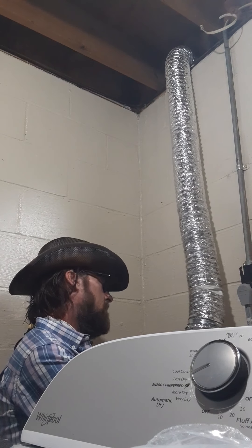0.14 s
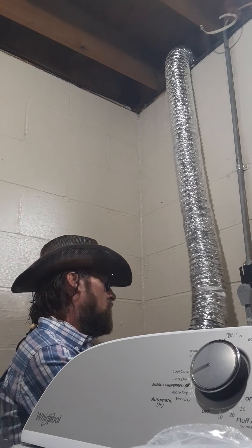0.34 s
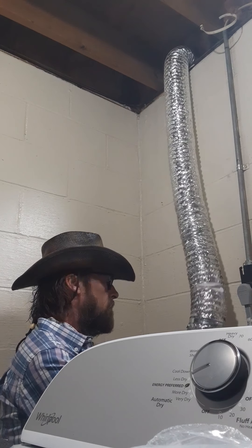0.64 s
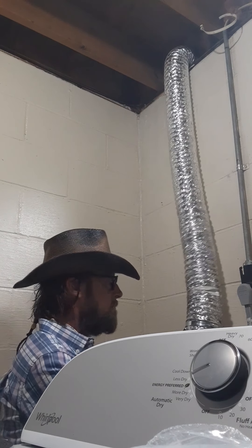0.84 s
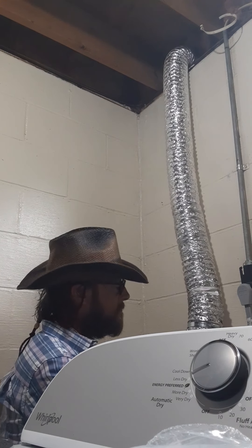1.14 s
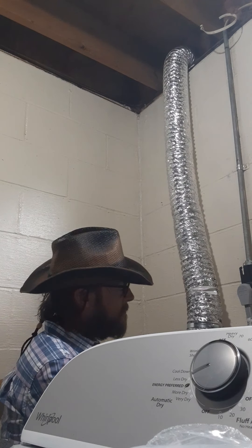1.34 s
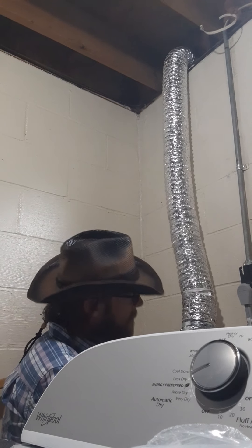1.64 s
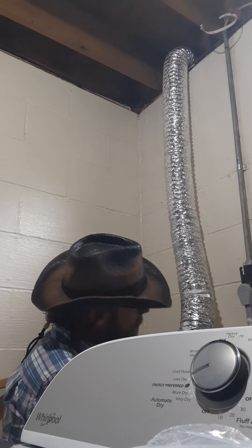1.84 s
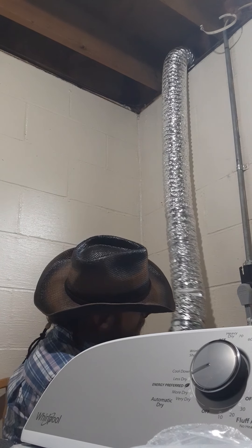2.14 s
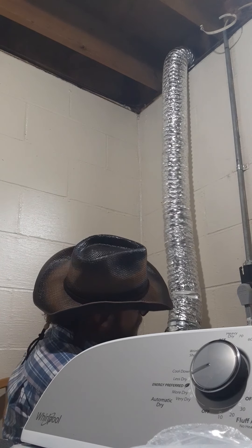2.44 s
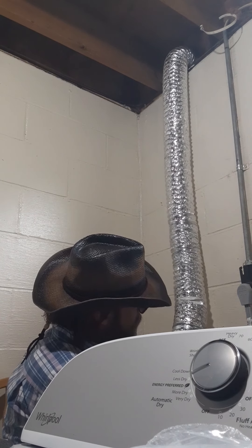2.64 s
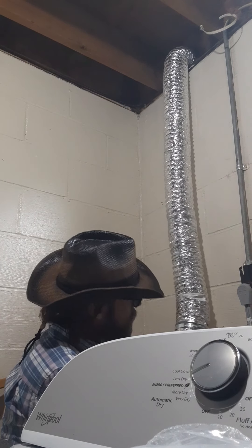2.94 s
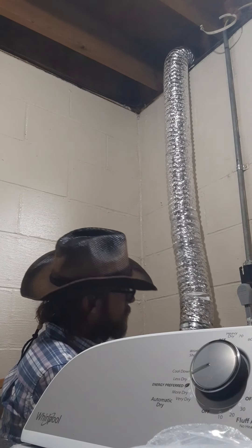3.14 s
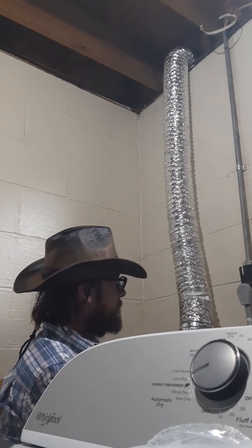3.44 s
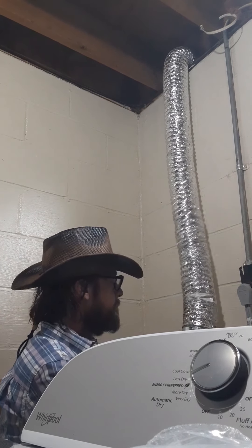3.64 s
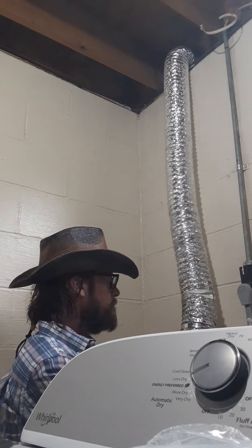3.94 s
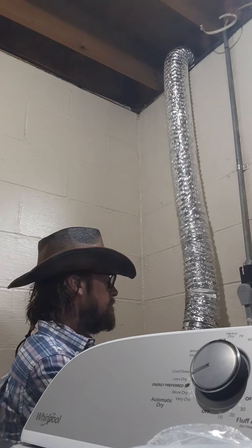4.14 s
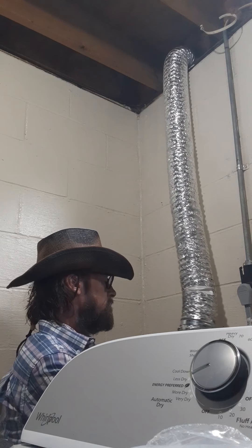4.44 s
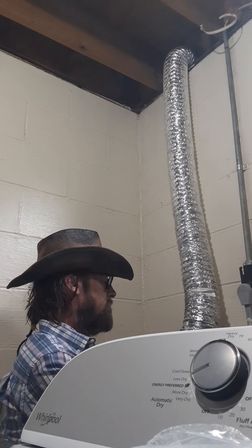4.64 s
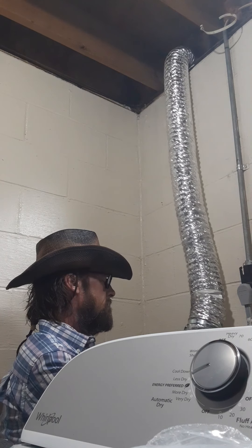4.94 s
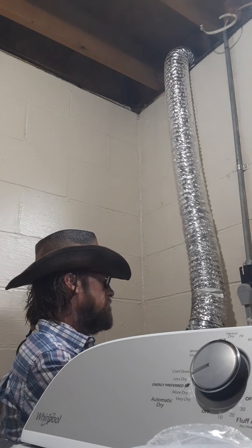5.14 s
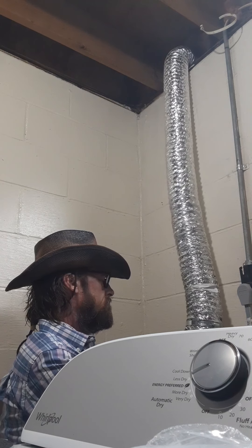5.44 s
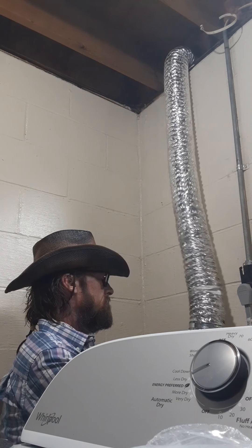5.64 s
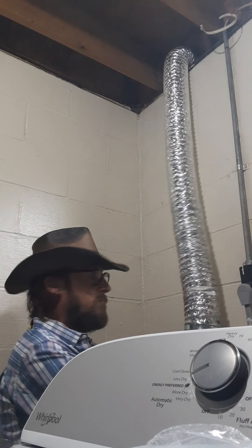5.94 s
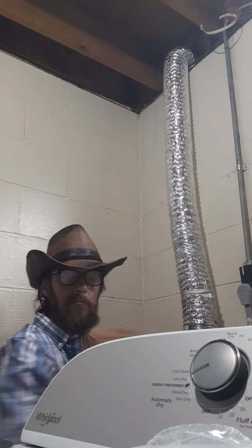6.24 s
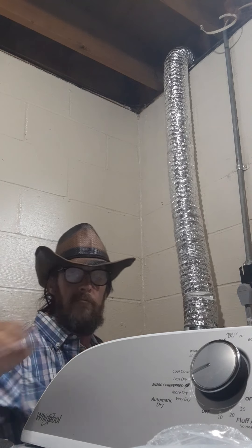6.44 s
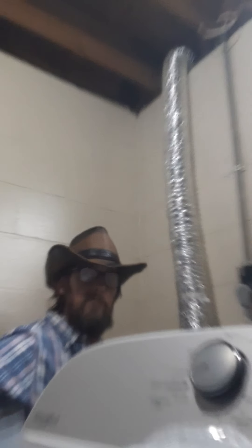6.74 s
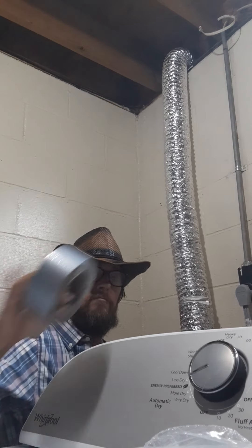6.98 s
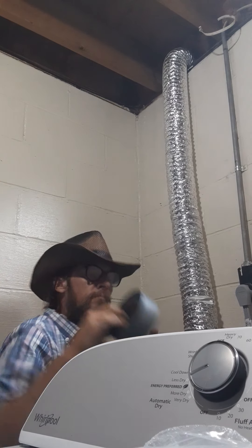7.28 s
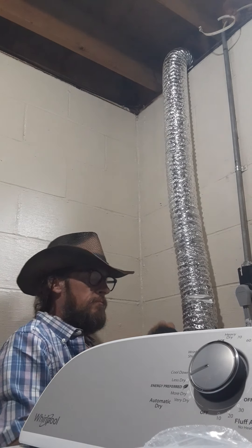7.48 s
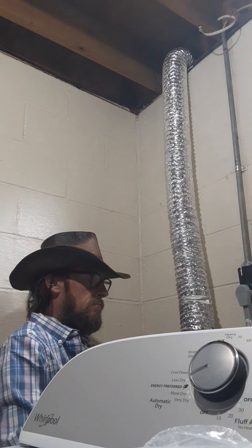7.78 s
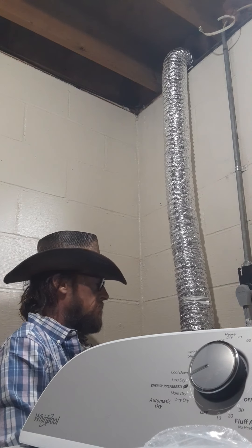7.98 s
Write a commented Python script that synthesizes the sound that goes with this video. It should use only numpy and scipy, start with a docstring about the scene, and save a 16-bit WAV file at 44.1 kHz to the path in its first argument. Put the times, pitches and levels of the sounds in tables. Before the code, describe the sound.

Thin foil ducting crinkles and snaps softly in a small basement, then a sharp metallic knock on sheet steel and a sudden loud tape rip.

```python
"""Foil duct and tape in a basement

A flexible foil dryer duct is handled in a concrete basement: noise bursts make its pleats snap and crackle,
and resonant puffs of noise make its body thump softly. A roll of duct tape slides on the dryer's sheet-steel
top (friction clicks through resonances) and knocks on it close to the right microphone (pushes, cracks, ringing
modes and rattle). Then comes a loud crackling rip of dense pops. A faint mains hum and noise lie under it all."""
import sys
import numpy as np
from scipy import signal
from scipy.fft import rfft, irfft, next_fast_len
from scipy.io import wavfile
from scipy.ndimage import uniform_filter1d

SR = 44100
rng = np.random.default_rng(int(sys.argv[2]) if len(sys.argv) > 2 else 0)


def field_ratio(decibels):
    """Amplitude ratio for a level in dB (20 dB per decade); scalars and array-likes work."""
    return 10 ** (np.asarray(decibels, dtype=float) / 20)


def to_wav(sig):
    """Store sig (one row per channel, or 1-D mono) as 16-bit WAV at the path in sys.argv[1].

    Samples outside -1..1 are clipped; the rate is SR.
    """
    pcm = np.clip(np.atleast_2d(sig), -1, 1) * 32767
    pcm = np.round(pcm).astype(np.int16)
    wavfile.write(sys.argv[1], SR, pcm.T)  # frames by channels


N = 357651

# steady room and microphone noise, relative spectrum: (f/Hz, level/dB)
FLOOR_COLOUR = [(18, -30.5), (30, -17.5), (79, -10), (127, -14.5), (141, -8.5), (245, -6.5), (266, -18.5),
                (303, -9.5), (962, -26.5), (5170, -19), (7670, -39.5), (12600, -22), (16000, -44)]
FLOOR_DB = -69.5
# mains hum: (f/Hz, level/dB)
HUM = [(120, -78.5)]

# restless hands on the foil: (t/s, level/dB)
RUSTLE = [(0.0, -57.5), (1.6, -62), (2.05, -59), (3.0, -56.5), (4.0, -50.5), (4.28, -63.5), (4.45, -52.5),
          (4.98, -63.5), (5.2, -51), (5.5, -56.5), (5.75, -49), (6.66, -60), (7.0, -68.5), (7.74, -84)]
# grips that crush many pleats at once: (start t/s, peak level/dB, rise/s, t60/s)
GRIPS = [(0.03, -33.5, 0.05, 0.28), (0.36, -45, 0.19, 0.17), (0.52, -39.5, 0.02, 0.29),
         (0.65, -44, 0.021, 0.86), (0.96, -46.5, 0.01, 0.43), (1.27, -53.5, 0.09, 0.34),
         (1.4, -43.5, 0.12, 0.6), (1.8, -58, 0.033, 0.19), (2.09, -33.5, 0.0076, 0.3),
         (2.28, -38.5, 0.043, 0.73), (2.362, -33.5, 0.013, 0.077), (2.6, -43, 0.053, 0.22),
         (2.74, -37.5, 0.16, 0.22), (3.12, -55.5, 0.022, 0.71), (3.5, -78, 0.017, 0.18),
         (3.72, -53, 0.07, 0.42), (4.29, -40.5, 0.055, 0.18), (5.02, -56.5, 0.039, 0.65),
         (7.305, -67.5, 0.022, 0.18)]
# dull scraping when duct or tape is pulled hard: (start t/s, peak level/dB, rise/s, t60/s)
SCRAPES = [(2.62, -49.5, 0.028, 0.98), (2.782, -32, 0.0034, 0.064), (2.803, -41.5, 0.003, 0.29),
           (2.838, -33.5, 0.041, 0.06), (7.99, -26, 0.015, 0.2), (8.04, -44, 0.011, 0.15)]
FOIL_BRIGHT_DB = -2.5  # treble of the foil crackle against its body

# single snaps of foil and tape: (t/s, level/dB, bright part level/dB)
SNAPS = [(0.0297, -25, -10.5), (0.0527, -16.5, -14.5), (0.0812, -10.5, -6.5), (0.0952, -20, -15),
         (0.3357, -36.5, -8), (0.3845, -26, -19.5), (0.4693, -33.5, -41), (0.5386, -16, -22.5),
         (0.6694, -31, -8.5), (0.9767, -34, -7.5), (1.1054, -34.5, -8), (1.294, -32.5, -2.5),
         (1.3967, -52, -20), (1.4541, -28, -4.5), (1.515, -29.5, -6), (1.6312, -31, -19),
         (1.6676, -28.5, -15), (2.0956, -20, -23), (2.1142, -16, -14), (2.2832, -30.5, -27),
         (2.3223, -27.5, -9.5), (2.3531, -22, -16), (2.3725, -15, -10), (2.4537, -17, -15.5),
         (2.5383, -30, -8), (2.623, -25, -13.5), (2.736, -33, -20), (2.7837, -27, -19), (2.8399, -23, -14),
         (3.1287, -32.5, -13), (3.3129, -33.5, -3), (3.3987, -36, -16), (3.576, -37, -21),
         (3.7616, -24.5, -25), (3.91, -24.5, -10.5), (3.9704, -35, -12), (4.1071, -31.5, -7.5),
         (4.1789, -40, -13), (4.2972, -36, -13.5), (4.3144, -27.5, -15), (4.4772, -45, -2),
         (4.5111, -37, -8), (4.5843, -29.5, -20), (4.7182, -34, -11), (4.9662, -40, -10),
         (5.0041, -37, -6.5), (5.0908, -38.5, -2.5), (5.12, -30, -5.5), (5.2681, -36, -6),
         (5.3081, -26, -15), (5.3572, -22.5, -15), (5.4779, -42, -2), (5.6437, -34, -15),
         (5.693, -25.5, -10.5), (5.7104, -37, 1), (5.8361, -34.5, -7.5), (5.8571, -32, -9),
         (5.9638, -36, -4.5), (6.001, -31, -20.5), (6.131, -39.5, -0.5), (6.2673, -35, -8.5),
         (6.5894, -40.5, -17), (6.893, -34.5, -7), (7.0264, -38.5, -13), (7.1521, -52.5, -15),
         (7.2394, -49.5, -10), (7.3133, -47, -10.5), (7.7654, -49, -4), (7.7717, -44, 8.5),
         (7.8096, -37, -1.5), (7.8364, -37.5, 9), (7.8504, -30.5, -13.5), (7.9014, -24, -24.5),
         (7.9084, -29.5, -3.5), (7.9329, -34.5, -18), (7.9809, -6, -12.5), (7.9964, -18, -11),
         (8.0214, -15.5, -14), (8.0494, -12.5, -4.5), (8.0654, -15, -6.5)]
# lone dry ticks near the microphones, no neighbours following: (t/s, level/dB, bright part level/dB)
TICKS = [(0.2478, -33.5, -12), (0.767, -27, -5), (0.9862, -23, -8), (1.289, -27.5, -3.5),
         (2.6188, -15, -19), (3.2047, -36.5, -1), (3.226, -29.5, -4.5), (3.5065, -32, -6),
         (3.525, -26, -21), (3.7275, -29, -10), (3.8738, -23, -27), (3.899, -33, -5), (5.9938, -22, -13.5),
         (7.858, -27.5, 3), (8.0123, -7, -12)]
AFTER_DB = -8.5  # the strongest a neighbouring pleat can be, against its snap
TICK_ECHO_DB = -10  # what a tick sends into the room, against its direct sound

# low part of the colour of snaps and crackle, relative spectrum: (f/Hz, level/dB)
DULL = [(70, -73.5), (120, -46.5), (200, -16), (492, -7.5), (631, -10), (686, -9.5), (1150, -9),
        (1800, -9.5), (2340, -11.5), (3960, -120)]
# middle part of the same colour: (f/Hz, level/dB)
BODY = [(250, -66), (760, -31.5), (1300, -15.5), (1720, -10.5), (2460, -6), (2650, -5.5), (2770, -5),
        (4590, -0.5), (5430, -5), (7500, -14), (9750, -36.5), (16500, -120)]
# treble part of the same colour: (f/Hz, level/dB)
BRIGHT = [(2000, -65.5), (4500, -51), (6500, -15.5), (8000, -13.5), (10500, -8.5), (13000, -12),
          (15600, -17.5), (16200, -38.5)]

# soft thumps of duct and body against wall and machine: (t/s, level/dB, f/Hz, t60/s)
THUMPS = [(0.097, -35.5, 96, 0.25), (0.385, -51, 68, 0.38), (0.666, -50, 147, 0.82), (1.01, -56, 131, 0.26),
          (1.383, -53.5, 163, 0.95), (2.145, -58, 110, 0.33), (2.57, -53.5, 121, 0.45),
          (2.836, -43, 87, 0.2), (3.766, -38.5, 73, 0.29), (4.369, -36, 56, 0.27), (4.598, -51, 74.4, 0.98),
          (5.023, -56, 76, 0.37), (5.149, -55, 125, 0.28), (0.082, -31.5, 600, 0.099),
          (0.404, -43.5, 530, 0.16), (0.462, -40, 367, 0.13), (0.54, -32, 947, 0.071),
          (0.643, -50, 417, 0.29), (0.709, -38, 393, 0.12), (1.384, -38, 204, 0.1), (1.542, -48, 884, 0.61),
          (1.631, -46, 555, 0.36), (2.106, -38.5, 765, 0.12), (2.193, -46, 950, 0.078),
          (2.308, -56, 444, 0.73), (2.36, -33, 220, 0.078), (2.545, -59, 428, 0.45),
          (2.658, -39, 771, 0.15), (2.781, -26, 980, 0.059), (2.844, -27.5, 510, 0.18),
          (3.227, -46.5, 407, 0.11), (3.722, -50.5, 604, 0.68), (4.343, -50.5, 313, 0.43),
          (4.581, -39, 204, 0.26), (4.895, -62, 593, 0.58), (5.269, -48.5, 790, 0.26),
          (5.851, -49, 424, 0.64), (6.044, -47, 435, 0.26), (6.196, -61, 330, 0.16)]

# drags of the roll: (start t/s, peak level/dB, rise/s, t60/s)
SLIDE = [(6.18, -63.5, 0.034, 3.2), (6.29, -53, 0.04, 0.7), (6.36, -57.5, 0.017, 0.25)]
# resonances of the hollow roll: (f/Hz, width/Hz, level/dB)
ROLL = [(130, 7.1, -3.5), (344, 51, -3.5), (1300, 140, -11.5), (1927, 49, -13)]

# contacts of the roll with the steel top: (t/s, level/dB, contact time/ms)
KNOCKS = [(6.676, -14.5, 0.022), (6.68, -0.5, 0.12), (6.683, -8, 0.07), (6.694, -14, 0.42),
          (6.6934, -6.5, 0.35), (6.699, -1.5, 0.076), (6.7027, -17.5, 0.47), (6.709, -18.5, 0.4),
          (6.718, -11.5, 0.3), (6.725, -16, 0.34), (6.734, -12.5, 0.17), (6.7385, -8.5, 0.27)]
# modes of the steel top: (f/Hz, level/dB, t60/s)
STEEL = [(227, -17, 0.61), (515, -6, 0.24), (579, -12.5, 0.3), (772, -7, 0.08), (900, -9.5, 0.24),
         (992, -1.5, 0.12), (1048, -1.5, 0.13)]
# the struck top booming on, then the side panels: (start t/s, peak level/dB, rise/s, t60/s)
PANEL_BOOM = [(6.672, -13, 0.024, 0.22), (6.68, -32.5, 0.13, 0.8)]
# relative spectrum of the panel boom: (f/Hz, level/dB)
BOOM_COLOUR = [(88, -25.5), (150, 1.5), (459, -3), (498, -5.5), (653, -8.5), (1070, -9.5), (2500, -21.5),
               (3250, -37), (5500, -120)]
# loose parts shaken again each time the roll rocks back: (start t/s, peak level/dB, rise/s, t60/s)
LOOSE_PARTS = [(6.67, -27.5, 0.007, 0.25), (6.721, -25.5, 0.0087, 0.22), (6.763, -36, 0.006, 0.36),
               (6.806, -38, 0.006, 0.48)]
# relative spectrum of the cracks and the loose parts: (f/Hz, level/dB)
JANGLE_COLOUR = [(1060, -36.5), (1800, -6.5), (3200, -7.5), (3950, -5.5), (4790, -5.5), (5640, -16),
                 (7360, -25.5), (12400, -13.5), (16000, -32)]
# the big drum humming on: (start t/s, peak level/dB, rise/s, t60/s)
DRUM_HUM = [(6.675, -34.5, 0.071, 1.08)]
# relative spectrum of the drum hum: (f/Hz, level/dB)
DRUM_COLOUR = [(24, -24), (40, -1), (59, 2), (92, -5), (150, -2.5), (200, -36.5), (330, -120)]
# filter on the far left side of a knock close to the right microphone: (f/Hz, level/dB)
FAR_LEFT = [(60, -24.5), (180, -11.5), (550, -14), (1650, -17.5), (4970, -14), (15000, -8.5)]

# tape pulled off the roll; a slow peel is thin and bright: (t/s, level/dB, bright part level/dB)
RIP = [(7.74, -79, 24), (7.768, -72.5, 17), (7.832, -76, 17), (7.84, -59, 21), (7.9, -58.5, 17.5),
       (7.94, -33.5, 7.5), (7.972, -15, -5.5), (8.02, -19, 0.5), (8.06, -27.5, 0), (8.11, -35, 1.5)]

# likeness of left and right in diffuse sound: (f/Hz, correlation)
ALIKE = [(60, 0.59), (400, 0.88), (950, 0.28), (2000, 0.014)]
# reverberation time of the basement: (f/Hz, t60/s)
BASEMENT_T60 = [(100, 0.6), (1000, 0.2), (4000, 0.16), (12000, 0.17)]
# the two microphones differ in colour: (f/Hz, left-right level/dB)
PORTS = [(60, -1.5), (110, 5), (200, 1.5), (380, 0), (700, -4), (1290, -2.5), (2380, 0), (4400, -5.5),
         (8120, 0.5), (15000, 3.0)]


def unit(x):
    """Scaled to rms 1."""
    return x / np.sqrt(np.mean(x ** 2) + 1e-20)


def along(points, hz):
    """(f/Hz, value) points read off on a log frequency axis."""
    f, v = np.transpose(points)
    return np.interp(np.log(hz + 1), np.log(f + 1), v)


def curves(rows):
    """One value per sample for each column after the time, -120 outside the rows."""
    s, *cols = np.transpose(rows)
    return [np.interp(np.arange(N) / SR, s, c, -120, -120) for c in cols]


def swells(rows, rise_db):
    """Gain of events, at most 1 s each, that set in rise_db under their peak, climb to it and die away."""
    t = np.arange(N) / SR
    gain = np.zeros(N)
    for s, db, rise, t60 in rows:
        rise = max(rise, .001)
        since = t[round(s * SR):][:SR] - s
        after = since - rise
        climb = rise_db * after / rise
        decay = -60 * after / max(t60, .02)
        gain[round(s * SR):][:SR] += field_ratio(db + np.where(after < 0, climb, decay))
    return gain


def coloured(x, spectrum):
    """x through the causal (minimum-phase) filter of energy 1 with this spectrum."""
    gain = field_ratio(np.maximum(along(spectrum, np.fft.rfftfreq(4096, 1 / SR)), -70))
    # folding the cepstrum forward in time puts the energy as early as possible
    cepstrum = irfft(np.log(gain))
    cepstrum[1:2048] *= 2
    cepstrum[2049:] = 0
    response = irfft(np.exp(rfft(cepstrum)))
    response /= np.linalg.norm(response)
    return signal.oaconvolve(np.atleast_2d(x), response[None], axes=1)[:, :N]


def pair(x):
    """Two unrelated signals mixed so that the bass is alike on both sides."""
    m = next_fast_len(x.shape[1] + 4096)
    likeness = np.clip(along(ALIKE, np.fft.rfftfreq(m, 1 / SR)), -1, 1)
    turn = np.arccos(likeness) / 2
    mid, side = irfft(rfft(x, m) * [np.cos(turn), np.sin(turn)], m)[:, :x.shape[1]]
    return np.array([mid + side, mid - side])


def clicks(per_second, spread_db):
    """A random train of clicks of scattered size, rms 1."""
    chance, size, sign = rng.random(N), rng.exponential(size=N), rng.standard_normal(N)
    struck = chance < per_second / SR
    return unit(struck * sign * field_ratio(spread_db * np.minimum(size, 4)))


def room_tone():
    """Steady coloured noise of room and microphones, with mains hum as a sine on both sides."""
    t = np.arange(N) / SR
    hum = sum(field_ratio(db) * np.sqrt(2) * np.sin(2 * np.pi * hz * t) for hz, db in HUM)
    noise = unit(pair(coloured(rng.standard_normal((2, N)), FLOOR_COLOUR)))
    return field_ratio(FLOOR_DB) * noise + hum


def foil_pops():
    """Gains of body, dull and bright part as countless small pops go off all along the pleats."""
    pops = unit(uniform_filter1d(np.abs(clicks(per_second=1100, spread_db=5.5)), size=12))
    foil = field_ratio(curves(RUSTLE)[0]) + swells(GRIPS, rise_db=14.5)
    dull = field_ratio(-12.5) * foil + swells(SCRAPES, rise_db=3.5)
    bright = field_ratio(FOIL_BRIGHT_DB) * foil
    return np.array([foil, dull, bright]) * pops


def crackle():
    """Foil pops and tape tears shape noise in three colours, which share the same moments."""
    gains = foil_pops() + tape_tears()
    parts = zip(gains, [BODY, DULL, BRIGHT])
    return sum(coloured(gain * rng.standard_normal(N), colour)[0] for gain, colour in parts)


def snaps(count=4):
    """Each pleat pops as a 3 ms burst and lets a few neighbours go just after; ticks pop alone."""
    s, db, bright_db = np.vstack([np.repeat(SNAPS, count, axis=0), TICKS]).T
    lone = np.arange(len(s)) >= count * len(SNAPS)
    follower = (np.arange(len(s)) % count > 0) & ~lone
    late, weaker, side = rng.random((len(s), 3)).T
    s = s + follower * (.002 + .025 * late)
    db = db + follower * (AFTER_DB - 6 * weaker)
    room_db = np.where(lone, TICK_ECHO_DB, ~follower * -2.0)
    # a little earlier or later at the right microphone, in samples
    lag = np.round(20 * (2 * side - 1))[:, None]

    t = np.arange(128) / SR
    bursts = rng.standard_normal((len(s), 3, len(t))) * field_ratio(-60 * t / 0.0084)
    bursts /= np.linalg.norm(bursts, axis=2, keepdims=True)
    start = np.round(s * SR)[:, None]
    where = [(start + d + np.arange(len(t))).astype(int).ravel() for d in (0, lag, 0)]
    out = np.zeros((3, N))  # left, right, sound sent into the room
    colours = [(-20, DULL), (8, BODY), (bright_db + 17.5, BRIGHT)]
    for k, (part_db, colour) in enumerate(colours):
        sized = [(field_ratio(db + part_db + more_db)[:, None] * bursts[:, k]).ravel()
                 for more_db in (0, 0, room_db)]
        placed = [np.bincount(w, g, N + SR)[:N] for w, g in zip(where, sized)]
        out += coloured(placed, colour)
    return out


def basement(x, size=2048):
    """Reverberation as decaying noise; each short piece gets a fresh random tail, so it does not sound tonal."""
    wet = np.zeros((2, N + SR))
    for start in range(0, N, size):
        hz, t, z = signal.stft(rng.standard_normal((2, 16384)), SR, nperseg=256)
        decay = field_ratio(-60 * t / along(BASEMENT_T60, hz)[:, None])
        tail = signal.istft(z * decay, SR, nperseg=256)[1]
        tail /= np.linalg.norm(tail[0])
        answer = signal.fftconvolve(x[None, start:start + size], tail, axes=1)
        first = start + 120  # the first wall answers after about 3 ms
        wet[:, first:first + answer.shape[1]] += answer
    return pair(wet[:, :N])


def thumps():
    """Each soft contact is a puff of noise in one broad resonance, rising over a few cycles."""
    t = np.arange(SR // 2) / SR
    hz = np.fft.rfftfreq(len(t), 1 / SR)
    out = np.zeros((2, N + SR))
    for s, db, centre_hz, t60 in THUMPS:
        below = centre_hz ** 2 - hz * hz
        resonance = (1j * hz * .9 * centre_hz / (below + 1j * hz * 1.54 * centre_hz)) ** 2
        puff = unit(irfft(rfft(rng.standard_normal((2, len(t)))) * resonance, len(t)))
        rise = 1 - np.exp(-t * centre_hz / 2.35)
        decay = field_ratio(db - 3.5 - 60 * t / max(t60, .02))
        out[:, round(s * SR):][:, :len(t)] += decay * rise * puff
    return pair(out[:, :N])


def slide():
    """The roll is dragged over the steel top: rough friction into the hollow roll's resonances."""
    hz = np.fft.rfftfreq(N, 1 / SR)
    hollow = 0
    for k, (centre, width, db) in enumerate(ROLL):
        mode = 1j * hz * width / (centre * centre - hz * hz + 1j * hz * width)
        hollow = hollow + (-1) ** k * field_ratio(db) * mode
    friction = [clicks(per_second=4000, spread_db=3) for side in range(2)]
    rub = irfft(rfft(friction) * hollow, N)
    return swells(SLIDE, rise_db=11) * unit(pair(rub))


def roll_contacts():
    """Each contact pushes the panel once, cracks harder the shorter it is, and rings the steel's modes."""
    t = np.arange(SR) / SR
    near = np.zeros(N + SR)
    for s, db, contact_ms in KNOCKS:
        u = 1000 * t / max(contact_ms, .02)
        push = u * u * (u - 3.2) * np.exp(-u)  # in, then back out
        crack_gain = field_ratio(-8.0 - 100 * contact_ms - 60 * t / 0.0085)
        crack = crack_gain * coloured(rng.standard_normal(SR), JANGLE_COLOUR)[0, :SR]
        ring = sum(field_ratio(level + rng.normal(0, 1.4) - 60 * t / t60) * np.sin(2 * np.pi * hz * t)
                   for hz, level, t60 in STEEL)
        near[round(s * SR):][:SR] += field_ratio(db) * (push + crack + field_ratio(-17) * ring)
    return near[:N]


def knock():
    """The contacts near the right microphone; panels boom, loose parts rattle and the big drum hums on."""
    boom = swells(PANEL_BOOM, rise_db=24.5) * coloured(rng.standard_normal((2, N)), BOOM_COLOUR)
    rattle = [clicks(per_second=9900, spread_db=0.5) for side in range(2)]
    jangle = swells(LOOSE_PARTS, rise_db=8) * coloured(rattle, JANGLE_COLOUR)
    drum_noise = pair(coloured(rng.standard_normal((2, N)), DRUM_COLOUR))
    drum = swells(DRUM_HUM, rise_db=0.0) * drum_noise

    right = roll_contacts() + boom[1] + jangle[1]
    # the left side hears the right one weaker and 17 samples later, plus its own boom and rattle
    left = 0.36 * np.roll(right, 17) + 1.2 * (boom[0] + jangle[0])
    m = next_fast_len(N)
    far = field_ratio(along(FAR_LEFT, np.fft.rfftfreq(m, 1 / SR)))
    left = irfft(rfft(left, m) * far, m)[:N]
    return np.array([left, right]) + drum * field_ratio([[-4], [3]])


def tape_tears():
    """Gains of body, dull and bright part as the peeling glue lets go in pops denser than the foil's."""
    level_db, bright_db = curves(RIP)
    tears = unit(uniform_filter1d(np.abs(clicks(per_second=3500, spread_db=2.5)), size=12))
    return field_ratio([level_db, level_db - 26.5, level_db + bright_db]) * tears


def scene():
    """Foil and tape in the basement, thumps, the roll on the steel top and the room tone."""
    pops, fine = snaps(), crackle()
    direct = pops[:2] + field_ratio(-13) * np.array([fine, np.roll(fine, -10)])
    foil = direct + basement(field_ratio(5.0) * pops[2] + field_ratio(-1.1) * fine)
    return foil + thumps() + slide() + knock() + room_tone()


def band_limit(x):
    """A steep low-pass at the top of the band."""
    return signal.sosfilt(signal.butter(12, 16650, fs=SR, output="sos"), x)


def record(dry):
    """The small microphones lose the deepest bass and differ in colour."""
    low_cut = signal.butter(2, 38, "highpass", fs=SR, output="sos")
    m = next_fast_len(N + 4096)
    lean_db = along(PORTS, np.fft.rfftfreq(m, 1 / SR)) / 2  # half to each side
    spectrum = rfft(signal.sosfilt(low_cut, dry), m)
    heard = irfft(spectrum * field_ratio([lean_db, -lean_db]), m)[:, :N]
    return band_limit(heard)


dry = scene()
out = record(dry)
to_wav(out)
```